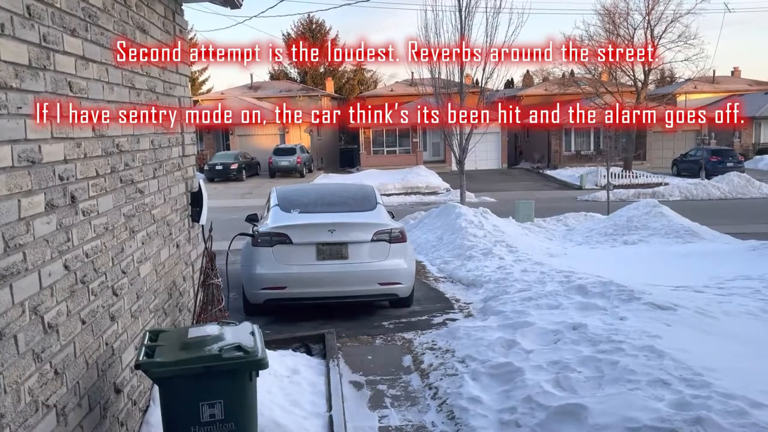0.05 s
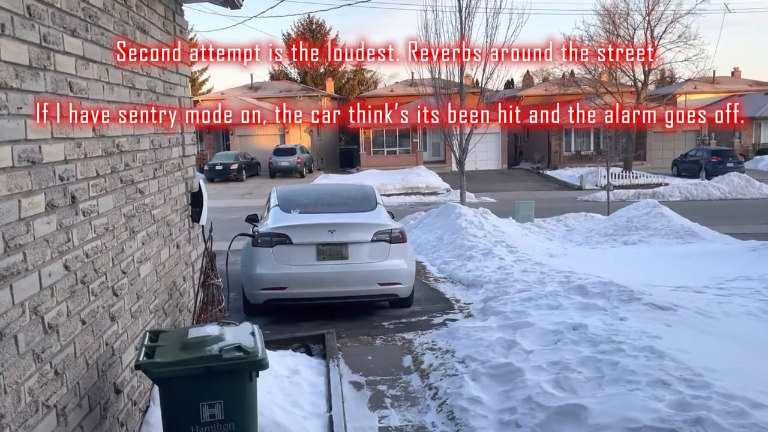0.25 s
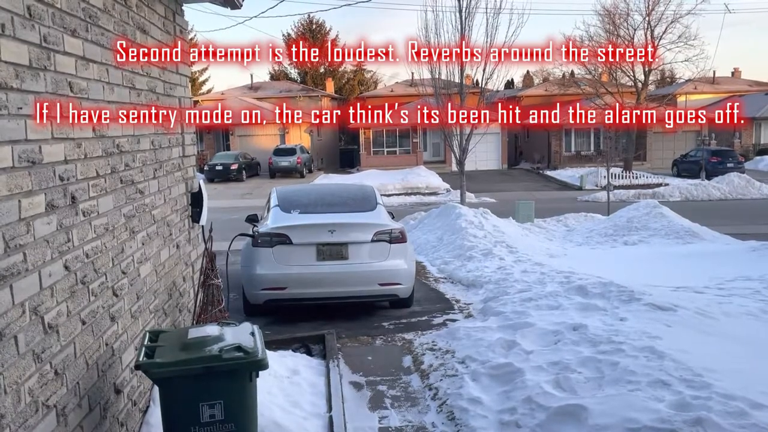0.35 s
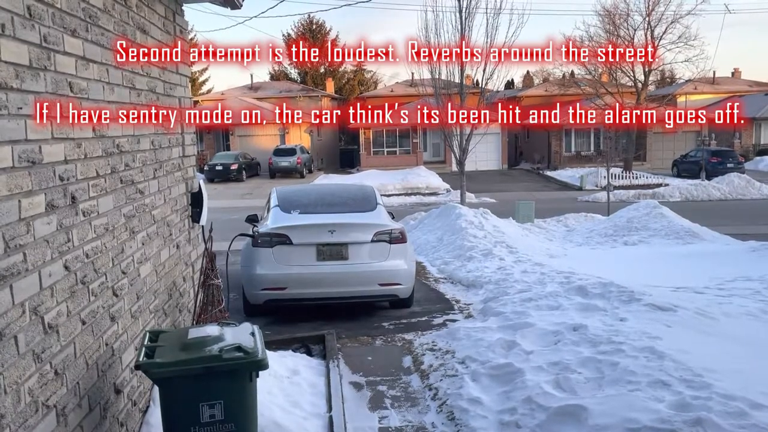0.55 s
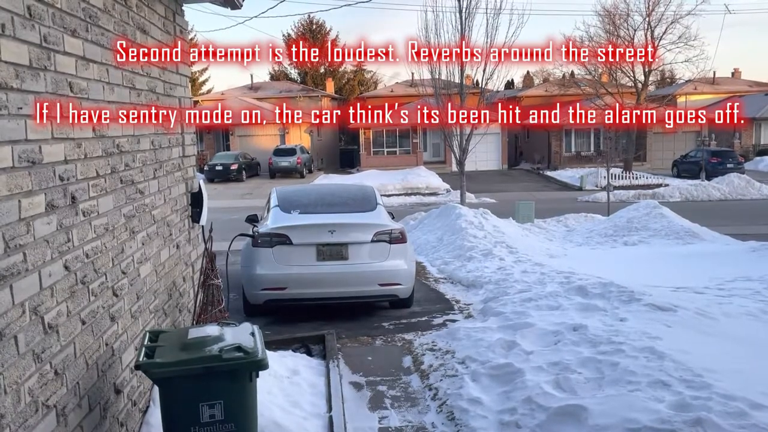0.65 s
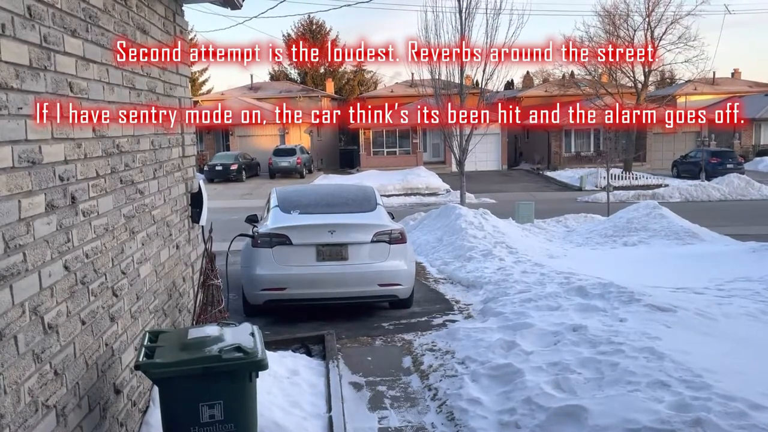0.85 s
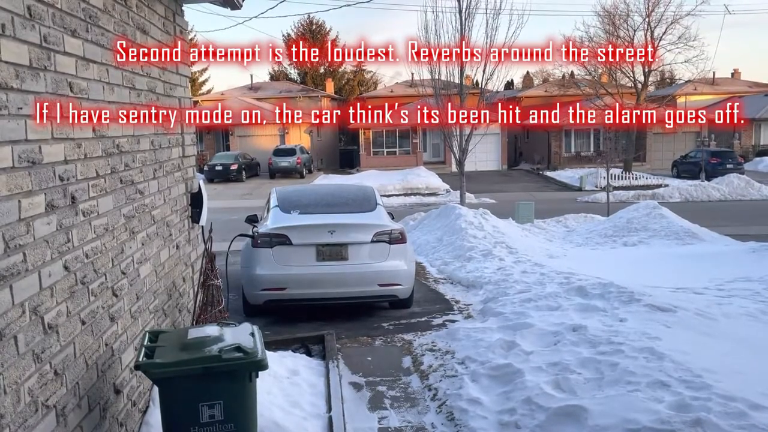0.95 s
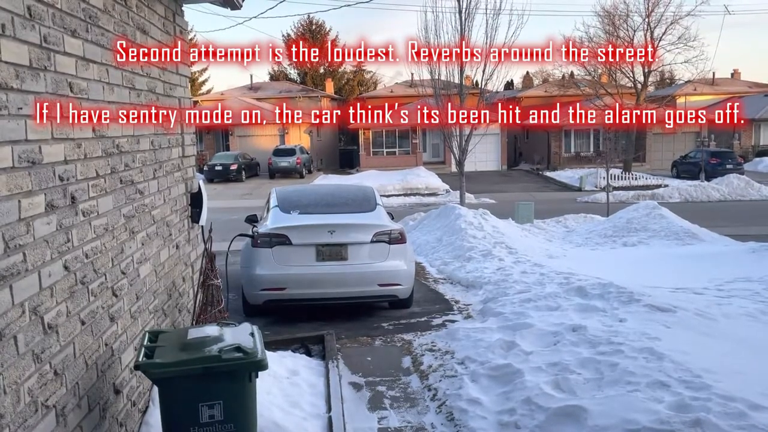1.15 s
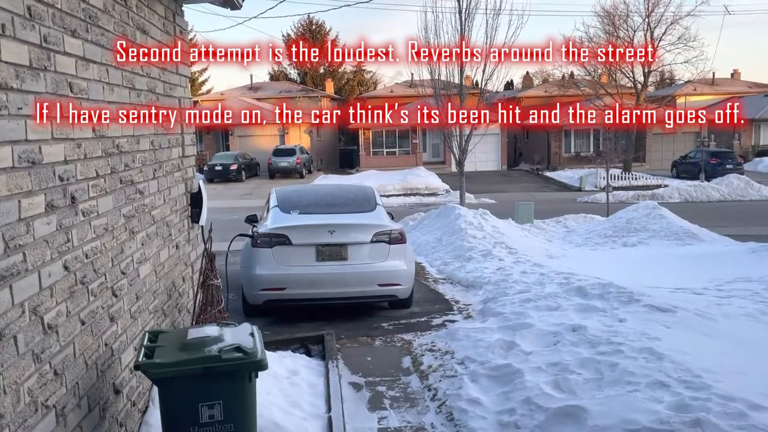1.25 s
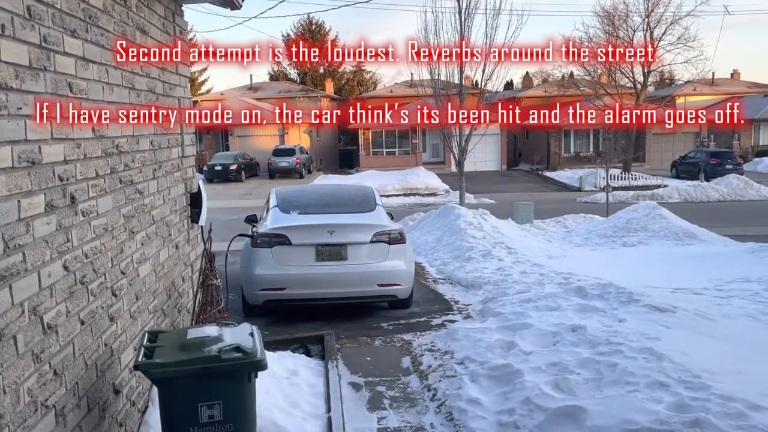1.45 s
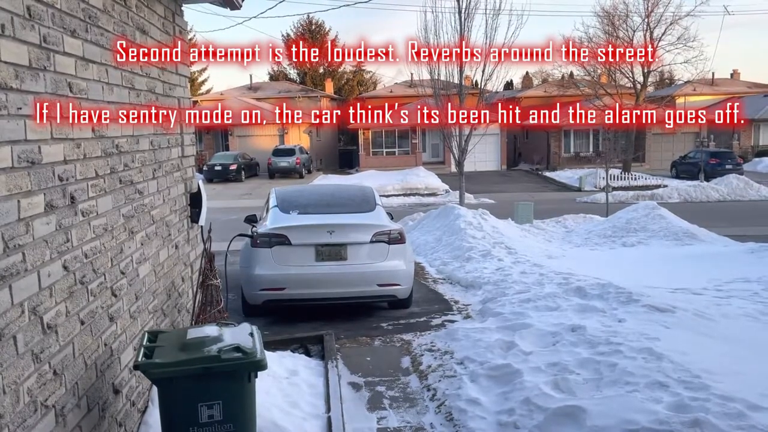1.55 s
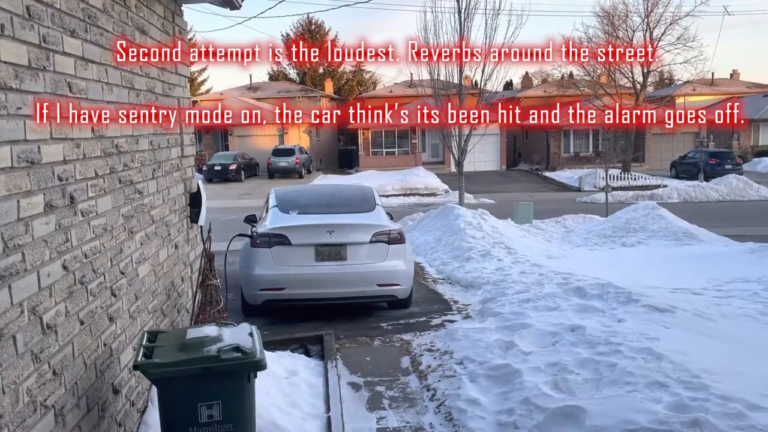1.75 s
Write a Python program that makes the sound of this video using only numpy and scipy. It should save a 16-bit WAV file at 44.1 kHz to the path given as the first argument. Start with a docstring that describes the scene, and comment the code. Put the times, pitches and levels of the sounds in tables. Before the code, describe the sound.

A parked car's heat pump lets out one loud, harsh burst, humming, buzzing, rattling and hissing at once. It echoes briefly off nearby houses. Distant traffic rumbles around the driveway throughout, and a small bird chirps faintly once afterwards.

```python
"""Distant traffic rumbles around a snowy driveway, then a parked car's heat pump gives one harsh burst.
Its compressor shaft hums, buzzes against the housing and rattles on every turn, while refrigerant
hisses through a valve. The burst rings briefly off a brick wall and cars, and houses across the street
echo it. Afterwards a small bird chirps once over the traffic."""
import sys
import numpy as np
from scipy import signal
from scipy.fft import rfft, irfft
from scipy.io import wavfile
from scipy.ndimage import uniform_filter1d

SR = 44100
rng = np.random.default_rng(int(sys.argv[2]) if len(sys.argv) > 2 else 0)


def persist_wave(psi):
    """Save psi, clipped to +-1, as 16-bit WAV."""
    counts = np.round(np.clip(psi, -1, 1) * 32767).astype(np.int16)
    wavfile.write(sys.argv[1], SR, np.atleast_2d(counts).T)


N = 79380
T = np.arange(N) / SR
HZ = np.fft.rfftfreq(N, 1 / SR)
SIDES = np.array([[.5], [-.5]])  # splits a left-minus-right amount between the channels


def amp(db):
    """Decibels to gain."""
    return 10 ** (np.asarray(db) / 20)


def unit(x):
    """Scales to rms 1."""
    return x / np.sqrt(np.mean(abs(x) ** 2) + 1e-20)


def curve(points, hz):
    """Reads a table on a log-frequency axis."""
    freq_hz, value = np.transpose(points)
    return np.interp(np.log(hz + 1), np.log(freq_hz + 1), value)


def glide(points):
    """Reads a table over time, holding its end values."""
    return np.interp(T, *np.transpose(points))


def fader_db(points, column=1):
    """Reads a dB column over time; silent outside the table."""
    rows = np.array(points)
    return np.interp(T, rows[:, 0], rows[:, column], left=-120, right=-120)


def drift(rate_hz):
    """Smooth complex random modulation of rms 1."""
    noise = rng.standard_normal(N) + 1j * rng.standard_normal(N)
    return unit(np.fft.ifft(noise * np.exp(-.5 * (np.fft.fftfreq(N, 1 / SR) / rate_hz) ** 2)))


def stereo_noise(colour, correlation):
    """Coloured noise of rms 1 in two partly alike channels."""
    left, other = rfft(rng.standard_normal((2, N)))
    alike = np.clip(curve(correlation, HZ), -1, 1)
    right = alike * left + np.sqrt(1 - alike ** 2) * other
    return unit(irfft(np.array([left, right]) * amp(curve(colour, HZ)), N))


# Tone of the road wash: freq_hz, gain_db
ROAD_COLOUR = [(20, -32), (45, -4), (85, -15.5), (120, -6.5), (200, -9.5), (260, -12), (450, -14.5),
               (590, -18), (780, -15), (1000, -19), (1500, -25), (2200, -32.5), (3200, -42.5), (4500, -47),
               (6500, -54.5), (8500, -64.5), (11000, -52), (14000, -66)]
# Stereo image of the background: freq_hz, correlation
BED_IMAGE = [(60, 0.88), (150, 1), (370, 0.7), (900, 0.094), (2300, 0.27), (13000, -0.47)]
# Slow ride on the wash: time_s, level_db
ROAD_FADER = [(0, -35.5), (0.25, -34.5), (0.6, -34), (1.0, -35.5), (1.35, -36), (1.65, -35.5), (1.8, -36.5)]
# Faint drones in the traffic: pitch_hz, width_hz, level_db
ROAD_DRONES = [(203.5, 3.4, -48.5), (450.5, 5.8, -51.5), (728, 9.2, -51), (800.4, 18, -52.5)]

def traffic(patchy_db=2):
    """Far-off road noise, mottled in time and frequency, with a few wavering drones."""
    frames = signal.stft(stereo_noise(ROAD_COLOUR, BED_IMAGE), nperseg=1024, noverlap=768)[2]
    patches = uniform_filter1d(rng.standard_normal(frames.shape[1:]), size=8, axis=0)
    patches = unit(uniform_filter1d(patches, size=12, axis=1))
    wash = signal.istft(frames * amp(patchy_db * patches), nperseg=1024, noverlap=768)[1][:, :N]
    drones = 0
    for pitch_hz, width_hz, level_db in ROAD_DRONES:
        alike = np.clip(curve(BED_IMAGE, pitch_hz), 0, 1)
        centre = np.sqrt(alike) * drift(width_hz)
        wide = np.sqrt(1 - alike) * np.array([drift(width_hz), drift(width_hz)])
        drones += amp(level_db) * unit(((centre + wide) * np.exp(2j * np.pi * pitch_hz * T)).real)
    return unit(wash) * amp(glide(ROAD_FADER)) + drones


# Tone of the low end: freq_hz, gain_db
RUMBLE_COLOUR = [(20, -20), (33, -33), (45, 11.5), (58, 8), (68, 21.5), (78, 6.5), (100, 0), (200, -60.5)]
# Its swells: time_s, level_db
RUMBLE_FADER = [(0, -39), (0.23, -33.5), (0.30, -39.5), (0.58, -31), (0.78, -34), (0.86, -35), (1.02, -36),
                (1.09, -33), (1.37, -45.5), (1.46, -33.5), (1.53, -47), (1.8, -40)]

def rumble():
    """Deep outdoor rumble that swells and sinks."""
    return stereo_noise(RUMBLE_COLOUR, BED_IMAGE) * amp(glide(RUMBLE_FADER))


# Decay of the street: freq_hz, t60_s
REVERB_DECAY = [(100, 0.15), (2000, 0.56), (12000, 0.15)]
# EQ on its tail: freq_hz, gain_db
REVERB_EQ = [(1100, -3.5), (2500, -5), (4000, -2)]

def street_reverb(source):
    """Walls and cars scatter the sound into a short diffuse tail."""
    hz, age_s, frames = signal.stft(rng.standard_normal((2, SR // 2)), SR, nperseg=256)
    decay = amp(-60 * age_s / curve(REVERB_DECAY, hz)[:, None])
    tail = signal.istft(frames * decay, SR, nperseg=256)[1]
    wet = signal.fftconvolve(source, tail / np.linalg.norm(tail[0]), axes=1)[:, :N]
    return irfft(rfft(wet) * amp(curve(REVERB_EQ, HZ)), N)


# EQ on the slap from the houses: freq_hz, gain_db
ECHO_EQ = [(100, -7), (400, -16), (1100, -1), (1600, -5), (2500, -7), (5000, 5), (8000, -13.5),
           (12000, -5.5)]

def house_echo(source, delay_s=0.1717, smear_s=0.015, send_db=-20):
    """House fronts across the street return one smeared copy."""
    taps = rng.standard_normal((2, N)) * np.exp(-abs(T - delay_s) / smear_s)
    taps = irfft(rfft(taps / np.linalg.norm(taps[0])) * amp(curve(ECHO_EQ, HZ)), N)
    return amp(send_db) * signal.fftconvolve(source, taps, axes=1)[:, :N]


# The bird's main voice: time_s, pitch_hz, level_db
BIRD_CHIRP = [(1.205, 3800, -67), (1.227, 3470, -58), (1.236, 3515, -55), (1.244, 3750, -54),
              (1.254, 4000, -57), (1.265, 4130, -74)]
# A lower voice that joins at the end: time_s, pitch_hz, level_db
BIRD_UNDERTONE = [(1.242, 3670, -70), (1.25, 3510, -59), (1.262, 3420, -64), (1.266, 3380, -80)]

def bird(rasp_depth=1.1, rasp_hz=300, reverb_db=-3):
    """One far chirp that dips, flicks upward and splits into a rasp."""
    rasp = rasp_depth * np.interp(T, (BIRD_CHIRP[0][0], BIRD_CHIRP[-1][0]), (0, 1)) ** 2
    call = np.zeros((2, N))
    for voice in (BIRD_CHIRP, BIRD_UNDERTONE):
        time_s, pitch_hz, _ = np.transpose(voice)
        whistle = np.exp(2j * np.pi * np.cumsum(np.interp(T, time_s, pitch_hz)) / SR)
        husky = (whistle * (1 + rasp * drift(rasp_hz))).real / np.hypot(1, rasp)
        call += amp(fader_db(voice, column=2)) * np.sqrt(2) * husky
    return call + amp(reverb_db) * street_reverb(call)


# Refrigerant flow through the valve: time_s, level_db
FLOW_FADER = [(0.37, -70), (0.41, -56), (0.46, -51.5), (0.498, -48), (0.511, -31.5), (0.56, -29.5),
              (0.62, -26), (0.68, -26), (0.712, -28), (0.745, -35), (0.78, -46.5), (0.84, -62)]
# Tone of its hiss: freq_hz, gain_db
HISS_COLOUR = [(500, -13), (1800, 5), (3000, 3), (3600, 0.5), (4300, 1), (5200, -0.5), (6400, 1.5),
               (7900, -2), (8800, -1.5), (11800, 2), (12600, -9.5), (13600, -15), (14200, -31)]
# Stereo image of the pump's noises: freq_hz, correlation
PUMP_IMAGE = [(200, .98), (500, .55), (1200, .65), (2500, .78), (3100, .5), (5500, .45), (6900, .15),
              (7900, .85), (9500, .75), (12000, .85)]
# Housing resonances as the flow surges and shuts off: peak_s, half_length_s, pitch_hz, width_hz, level_db
HOUSING_HONKS = [(0.502, 0.015, 2150, 87, -37.5), (0.556, 0.015, 556, 29, -36.5),
                 (0.614, 0.084, 1900, 8, -38), (0.69, 0.03, 3670, 200, -35), (0.713, 0.016, 856, 65, -28.5)]

def valve(turns, pulse_depth=.13, sputter_depth=0.076):
    """Refrigerant sputters through the valve, swelling on every turn, and makes the housing honk."""
    pulse = unit(np.exp(pulse_depth * np.cos(2 * np.pi * turns)))
    sputter = 1 + sputter_depth * drift(rate_hz=60).real
    hiss = stereo_noise(HISS_COLOUR, PUMP_IMAGE) * amp(fader_db(FLOW_FADER)) * pulse * sputter
    honks = 0
    for peak_s, half_length_s, pitch_hz, width_hz, level_db in HOUSING_HONKS:
        band = np.exp(-.5 * ((HZ - pitch_hz) / width_hz) ** 2)
        ring = unit(irfft(rfft(stereo_noise(HISS_COLOUR, PUMP_IMAGE)) * band, N))
        honks += ring * amp(level_db) * np.exp(-((T - peak_s) / half_length_s) ** 2)
    return hiss + honks


# Tone of the scrapes: freq_hz, gain_db
RATTLE_COLOUR = [(100, 4), (300, -11), (570, 3.5), (750, 4), (1100, 1.5), (1750, -2), (2250, 4), (2650, 7),
                 (2850, -18), (3600, -7), (5000, -35)]
# Rise and fall of the rattle: time_s, level_db
RATTLE_FADER = [(0.42, -71), (0.495, -49), (0.515, -33), (0.56, -30), (0.62, -31), (0.70, -30),
                (0.735, -32.5), (0.78, -48.5)]

def rattle(turns, lead_turns=.15, decay_turns=.25, floor=.22, spread_db=2.5):
    """Each turn throws off a sharp, quickly dying scrape, some harder than others."""
    stroke, age_turns = np.divmod(turns + lead_turns, 1)
    force = amp(spread_db * rng.standard_normal(N))[stroke.astype(int)]
    chatter = unit(floor + force * np.exp(-age_turns / decay_turns))
    return stereo_noise(RATTLE_COLOUR, PUMP_IMAGE) * chatter * amp(fader_db(RATTLE_FADER))


# Low hum of the shaft: time_s, first_order_db, second_order_db
HUM_FADERS = [(0.38, -60, -75), (0.48, -27.5, -58), (0.505, -40, -34), (0.53, -29.5, -32.5),
              (0.58, -20.5, -26), (0.62, -23.5, -20), (0.708, -20.5, -22.5), (0.728, -26, -47),
              (0.78, -57, -36)]

def hum(turns, shake_depth=.16):
    """The shaft's two lowest orders shake the whole car, a little unevenly."""
    tones = 0
    for order in (1, 2):
        phase = 2 * np.pi * order * turns + (order - 1) * np.pi / 2
        tones += amp(fader_db(HUM_FADERS, column=order)) * unit(np.cos(phase))
    return tones * (1 + shake_depth * drift(rate_hz=25).real)


# Swell of the buzz in two bands: time_s, mid_gain_db, top_gain_db
BUZZ_FADERS = [(0.39, -28, -50), (0.45, -12, -32), (0.495, -3.5, -7), (0.545, 1, 0.5), (0.62, 0.5, 1),
               (0.66, -1, 1.5), (0.70, -2, -3), (0.72, -9, -11), (0.755, -32, -24)]
# Harmonics of the shaft speed, before that swell: order, building_pressure_db, full_pressure_db
BUZZ_ORDERS = [(6, -43, -55), (7, -56, -40), (8, -58, -42), (9, -38, -39), (10, -42, -45), (11, -37.5, -49),
               (12, -30.5, -32.5), (13, -44, -51), (14, -44, -36), (15, -50, -45), (16, -50, -38),
               (17, -34.5, -33), (18, -43, -50), (21, -44, -54), (22, -45, -41), (23, -41, -39),
               (24, -36, -38.5), (25, -46, -36.5), (26, -43, -50), (27, -34, -28), (28, -41, -33.5),
               (29, -51, -38.5), (30, -59, -44), (34, -56, -45), (39, -55, -45)]

def buzz(turns, shaft_hz, mid_hz=1010, top_hz=2560, waver_db=-42, top_smear_cycles=.35):
    """Upper orders ring in the housing and shift colour as pressure builds; weak ones waver most."""
    mid_db, top_db = fader_db(BUZZ_FADERS, column=1), fader_db(BUZZ_FADERS, column=2)
    halfway_s, build_s = 0.59, 0.039
    pressure = .5 + .5 * np.tanh((T - halfway_s) / build_s)
    tones = np.zeros((2, N))
    for order, building_db, full_db in BUZZ_ORDERS:
        top_share = curve([(mid_hz, 0), (top_hz, 1)], order * shaft_hz)
        waver = min(amp(waver_db - max(building_db, full_db)), 1)
        sway = (1 + waver * np.array([drift(rate_hz=20), drift(rate_hz=20)])) / np.hypot(1, waver / 2)
        # The top orders stay closest in phase to the stroke.
        lag_cycles = (1 - top_share * (1 - top_smear_cycles)) * (rng.random() - .5)
        tone = (sway * np.exp(2j * np.pi * (order * turns + lag_cycles))).real
        strength = (1 - pressure) * amp(building_db) + pressure * amp(full_db)
        swell = amp(mid_db + top_share * (top_db - mid_db))
        tones += np.sqrt(2) * strength * swell * tone
    return tones


# Compressor speed, sagging slightly: time_s, speed_hz
SHAFT_SPEED = [(0.40, 93.55), (0.46, 93.2), (0.52, 92.6), (0.62, 92.36), (0.76, 92.3)]
# Pan of the pump by band: freq_hz, left_minus_right_db
PUMP_BALANCE = [(100, -0.5), (200, 1.5), (400, 6), (700, 0.5), (1200, -6.5), (1700, -5), (2500, 0.5),
                (3300, 1), (5000, 1.5), (10000, 0)]
# Phase lag of the right channel: freq_hz, lag_rad
PUMP_RIGHT_LAG = [(1100, 0), (1500, .8), (4400, 1.3), (5700, 2.7), (7700, 3.3), (8700, 3.1), (11500, 1.3),
                  (12600, 0)]

def heat_pump(jitter=.002):
    """One shaft drives hum, buzz, rattle and hiss; the treble reaches the left ear first."""
    speed_hz = glide(SHAFT_SPEED) * (1 + jitter * drift(rate_hz=31).real)
    turns = np.cumsum(speed_hz) / SR
    burst = hum(turns) + buzz(turns, shaft_hz=SHAFT_SPEED[-1][1]) + rattle(turns) + valve(turns)
    pan = amp(SIDES * curve(PUMP_BALANCE, HZ))
    lag = np.exp(1j * np.array([[0], [-1]]) * curve(PUMP_RIGHT_LAG, HZ))
    return irfft(rfft(burst) * pan * lag, N)


def scene(reverb_db=-18, bed_left_db=1.2):
    """The pump, its reflections and the bird over a bed of traffic and rumble."""
    pump = heat_pump()
    bed = (traffic() + rumble()) * amp(bed_left_db * SIDES)
    return pump + amp(reverb_db) * street_reverb(pump) + house_echo(pump) + bed + bird()


def record(dry, cutoff_hz=14300):
    """A steep low-pass trims the air off the mix."""
    lowpass = signal.firwin(511, cutoff_hz, window=("kaiser", 9), fs=SR)
    return signal.oaconvolve(dry, lowpass[None], "same")


dry = scene()
out = record(dry)
persist_wave(out)
```